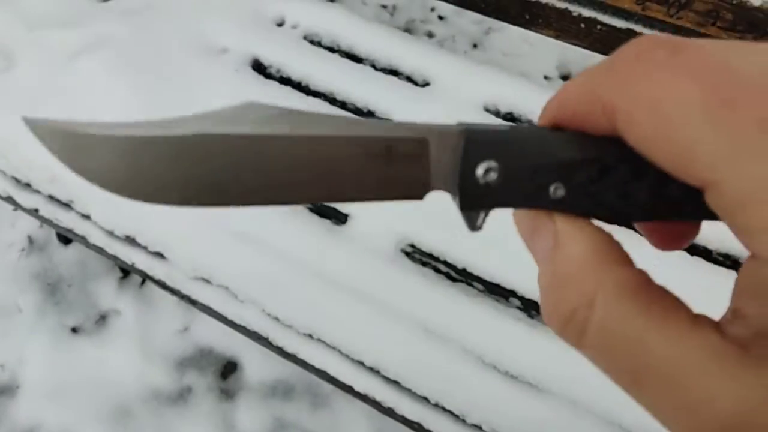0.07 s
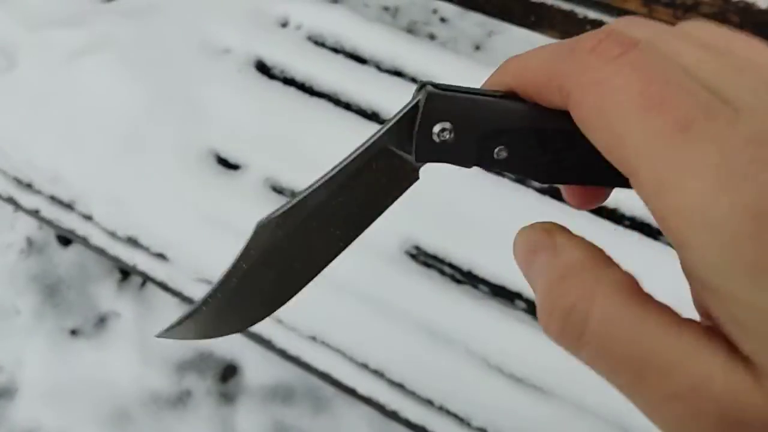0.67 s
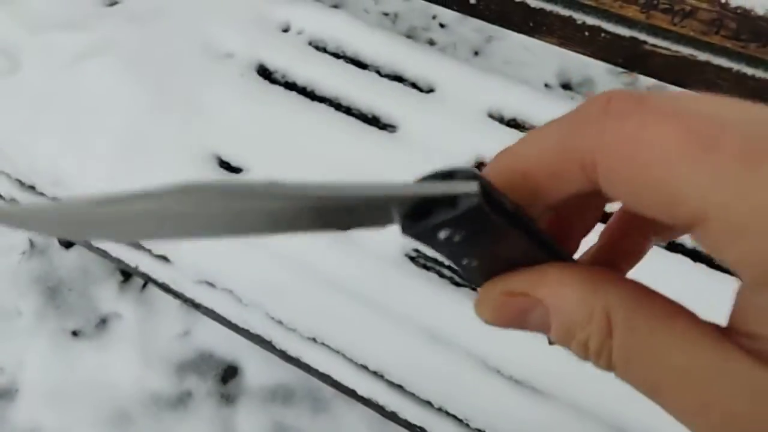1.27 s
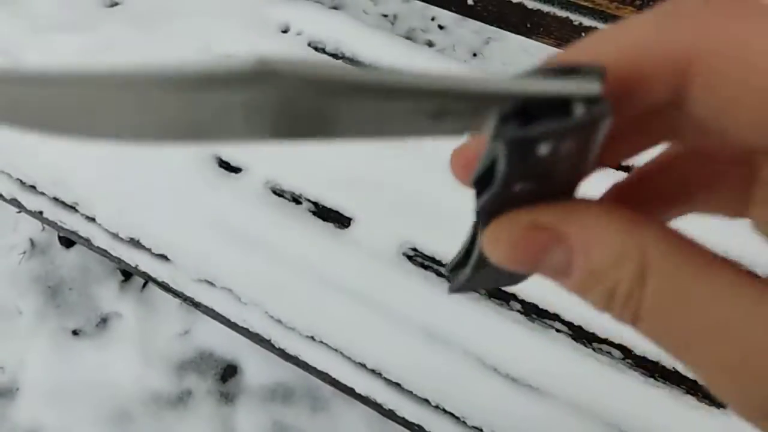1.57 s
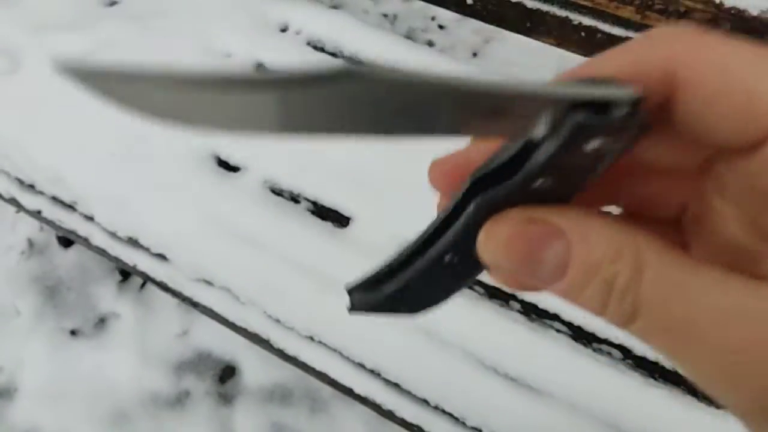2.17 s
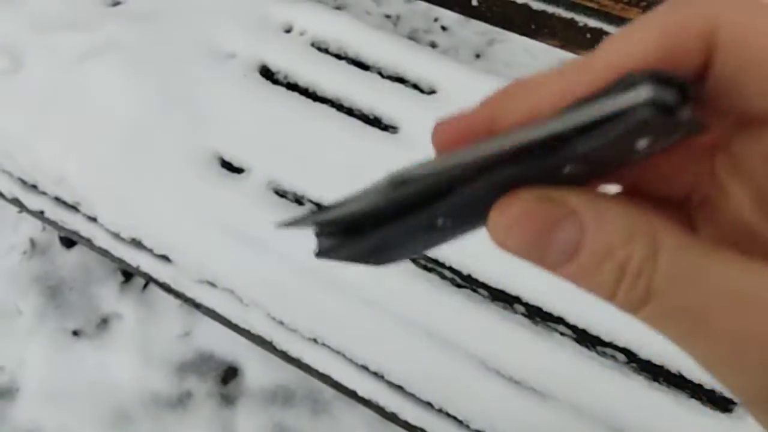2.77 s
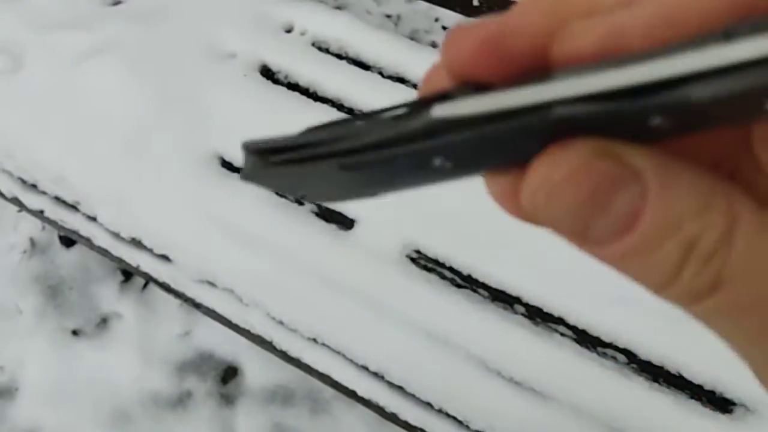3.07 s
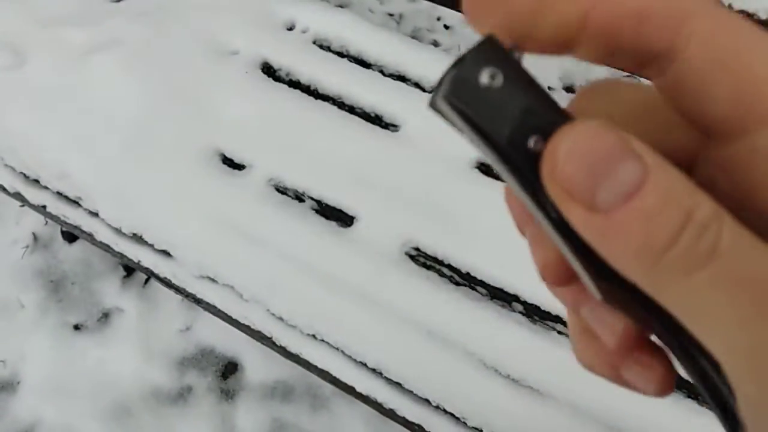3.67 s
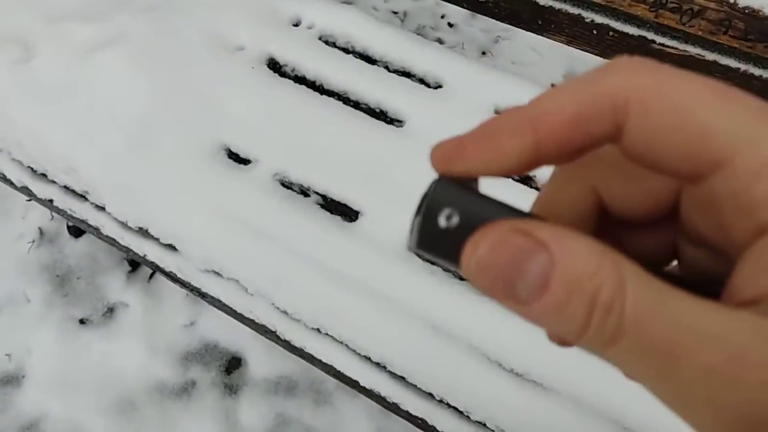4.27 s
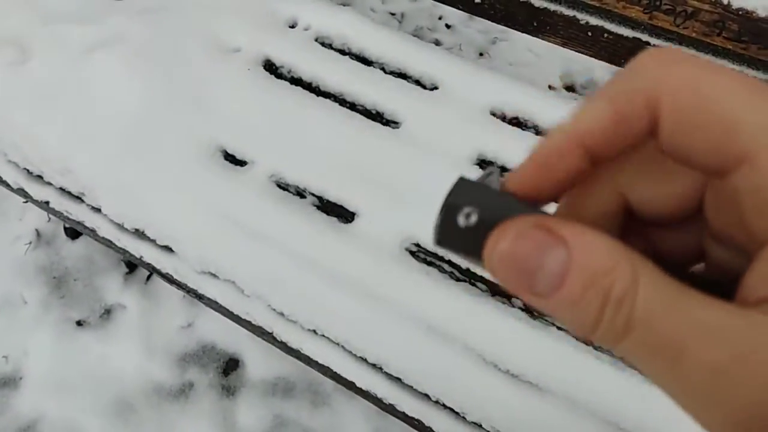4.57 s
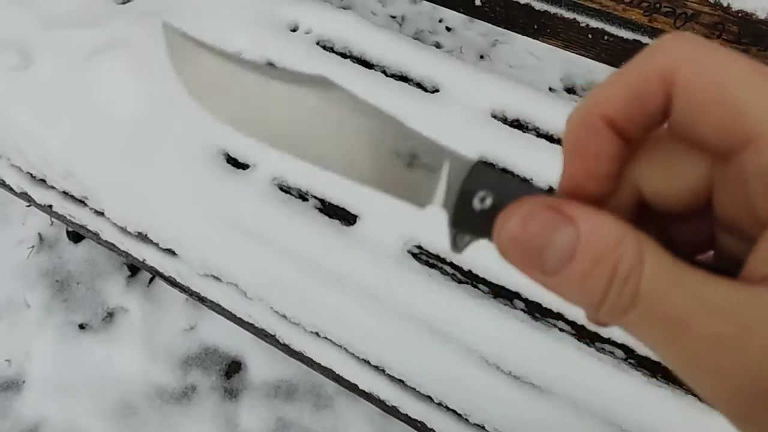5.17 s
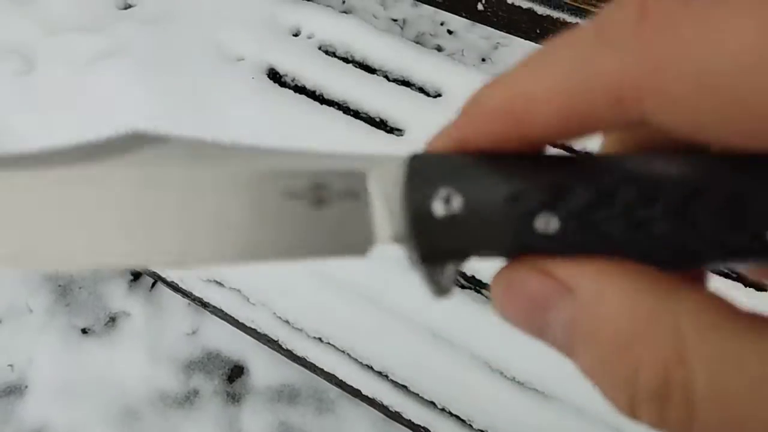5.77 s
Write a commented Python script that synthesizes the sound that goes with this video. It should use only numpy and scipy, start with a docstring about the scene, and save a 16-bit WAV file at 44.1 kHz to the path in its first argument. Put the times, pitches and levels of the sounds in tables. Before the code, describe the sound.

Sharp metallic clacks of a pocket knife closing and flicking open outdoors, with soft sleeve swishes, distant engine rumble and faint chirps.

```python
"""Outdoors in the snow, a flipper knife is unlocked, folded shut and flicked open close to a phone.
The lock snaps, the blade clacks and makes the steel ring, and the pivot scrapes and squeaks.
A nylon jacket sleeve swishes as the arm moves. Small birds chirp, a far engine gains speed over
an idling motor, something whoops once, and distant traffic hums behind it all.
The last clack is so loud that the phone's limiter briefly turns everything down."""
import sys
import numpy as np
from scipy import signal
from scipy.fft import rfft, irfft
from scipy.io import wavfile
from scipy.ndimage import uniform_filter1d, minimum_filter1d

SR = 44100
rng = np.random.default_rng(int(sys.argv[2]) if len(sys.argv) > 2 else 0)


def unload_wav(signal):
    """Save mono or channel-first audio to the path in sys.argv[1] as 16-bit WAV at rate SR, clipped to [-1, 1]."""
    wavfile.write(
        sys.argv[1],
        SR,
        np.round(np.clip(np.atleast_2d(signal).T, -1, 1) * 32767).astype(np.int16),
    )


N = 265482
T = np.arange(N) / SR
HZ = np.fft.rfftfreq(N, 1 / SR)

# Levels are relative: later gains and filters change them. side_db is left minus right.
# The blade shuts and bounces, then flies open against its stop:
# start_s, level_db, chatter_s, brightness_db_per_octave, side_db
BLADE_HITS = [(3.0958, -12, 0.00044, 1, 3), (3.0962, -2.5, 0.00083, 5.5, -3.5),
              (3.0970, -6.5, 0.0011, 4, 0), (3.0979, -4.5, 0.0016, 2.5, -10.5),
              (3.1030, -18, 0.00034, -3, 4), (3.1038, -13.5, 0.00099, 0, -9.5),
              (5.1948, -31, 0.0006, 1, -7), (5.2568, -21, 0.0019, -1, -7), (5.2614, -3.5, 0.00012, 3.5, -4),
              (5.2709, -1.5, 0.00057, -2, -8), (5.2715, 7.5, 0.00038, 0.5, -3),
              (5.2720, 15.5, 0.00064, 1.5, -3.5), (5.2786, -5.5, 0.00064, 26, -21)]
# The thumb pushes the lock aside: start_s, level_db, chatter_s, brightness_db_per_octave, side_db
LOCK_HITS = [(.6639, -12.5, 0.00037, 5.5, -11), (.6644, -26, 0.00089, 16, -4),
             (.6651, -22, 0.00023, -3, -1), (.6708, -33.5, .0006, 2, -17)]
# Steel and skin slide on the knife: start_s, length_s, level_db, side_db
SLIDE_STROKES = [(0.684, 0.057, -63.5, -13), (0.873, 0.13, -66, -2), (3.092, 0.021, -44, -17),
                 (3.692, 0.077, -70.5, -6), (3.865, 0.17, -69.5, -3.5), (4.57, 0.032, -63.5, -2),
                 (4.73, 0.034, -53, -5.5), (4.754, 0.06, -72, -3), (4.952, 0.18, -70.5, -8),
                 (5.183, 0.045, -54, -8), (5.203, 0.055, -48, -7), (5.247, 0.015, -45.5, -8),
                 (5.266, 0.012, -24.5, -11), (5.434, 0.048, -56.5, -3)]
# The knife's ring with the blade out: pitch_hz, level_db, fade_60db_s
OPEN_RING = [(2000, -6, 0.013), (2400, -14, 0.007), (3380, -13, 0.009), (4250, 3, 0.009), (4900, -6, 0.007),
             (5450, -10, .006), (7300, -15, 0.0084), (8190, -1, 0.0065), (9000, -10, 0.0062),
             (10380, -1, 0.005), (11300, -14, 0.0068), (14000, -8, .005)]
# Its ring with the blade in the handle: pitch_hz, level_db, fade_60db_s
SHUT_RING = [(2250, -12, .009), (2550, -9, .009), (2855, -8, 0.008), (3750, -15, 0.007), (4450, 3.5, .009),
             (4950, 4.5, 0.009), (5600, -8, .007), (6150, -2.5, 0.006), (7450, 0, 0.007), (8420, 8.5, .008),
             (9170, 1, 0.007), (10970, 10, 0.011), (12000, -10, .005), (13800, -10, 0.005)]
# The ring of the lock's spring: pitch_hz, level_db, fade_60db_s
LOCK_RING = [(4600, -6, .007), (5050, 2, 0.008), (5600, -3, 0.006), (8450, 2, 0.005), (9250, 5, 0.006),
             (10060, 2, 0.005), (11200, -9, .005), (12600, -7, .004), (14100, -3, .005)]
# The pitchless crack of a hit: frequency_hz, gain_db
CRACK_SPECTRUM = [(100, -30), (850, -10.5), (1400, -29), (3000, -33), (6000, -14.5), (8000, -5),
                  (11000, -5), (14000, -13.5), (15000, -14), (16500, -38.5)]
# The dry hiss of sliding: frequency_hz, gain_db
SCRAPE_SPECTRUM = [(200, -34.5), (1400, -20), (1750, -15), (2000, 0), (2250, -11.5), (2700, -18),
                   (3200, -16), (4000, -9), (5200, -3), (6200, -8.5), (7500, -0.5), (11000, -3.5),
                   (12400, 4), (14200, 10.5), (14800, -39)]
# The pivot squeaks: start_s, length_s, pitch_hz, glide_hz, quaver_share, level_db
PIVOT_SQUEAKS = [(.888, .062, 8600, 150, .034, -74.5), (.938, .045, 8200, -200, .018, -76)]
# A fingernail snaps off the opening tab: start_s, tick_db, thud_db, thud_fade_s, side_db
NAIL_SNAPS = [(4.5890, -13, -28.5, 0.001, -0.5), (4.5905, -20.5, -48, 0.0012, -15)]
# The ring of nail and tab: pitch_hz, level_db, fade_60db_s
TAB_RING = [(1000, -4, 0.0035), (2770, -16, 0.005), (6400, -1, 0.005), (7150, 1, 0.006), (7900, 1, 0.007),
            (9400, -7, 0.007)]

# The arm rocks to and fro: going_db, going_length_s, return_db, return_length_s
ARM_SWINGS = [(-65.5, 0.15, -63, 0.19), (-62.5, 0.14, -64.5, 0.13), (-58.5, 0.15, -62, 0.14),
              (-58, 0.13, -57, 0.17), (-57, 0.15, -67, 0.095), (-57.5, 0.18, -57, 0.21),
              (-57, 0.12, -53, 0.16), (-58.5, 0.15, -64, 0.18)]
# Single moves of the arm: middle_s, length_s, level_db, side_db
ARM_MOVES = [(0, 0.46, -68, 3), (0.327, 0.52, -69, 2.5), (0.538, 0.13, -68, 5), (.73, 0.51, -71.5, 2),
             (1.248, 0.28, -63.5, 3), (3.504, 0.46, -65.5, -2), (4.628, 0.34, -74, 2.5),
             (5.45, 0.66, -67, -11), (5.794, 0.89, -60.5, 6.5)]
# Nylon rubbing on nylon: frequency_hz, gain_db
NYLON_SPECTRUM = [(100, 0), (400, -3), (1500, 1.5), (3000, 2), (5000, -2), (7000, 1), (10000, -0.5),
                  (12500, 4.5), (14200, 10), (14700, -49.5)]

# A bird repeats one raspy note: start_s, level_db
BIRD_RASPS = [(1.515, -71), (1.635, -68), (1.78, -68.5), (2.05, -73.5)]
# Bird whistles: start_s, length_s, pitch_hz, glide_hz, level_db
BIRD_WHISTLES = [(4.932, .06, 4130, 300, -61), (5.013, .046, 4290, -110, -64),
                 (5.078, 0.046, 4180, 140, -65), (5.066, .09, 6510, 560, -73), (5.09, .055, 4570, 250, -74),
                 (5.141, 0.068, 4890, 150, -70), (5.14, .095, 6850, 60, -69.5),
                 (5.188, .034, 3740, -350, -62), (5.436, 0.057, 4130, -250, -69),
                 (5.512, 0.055, 4030, -280, -63.5), (5.553, .065, 4110, -450, -63)]
# The flock twitters farther off: from_s, to_s, note_level_db
FLOCK_SPELLS = [(1.5, 1.85, -77.5), (2.05, 2.2, -83), (4.92, 5.22, -75), (5.33, 5.6, -74.5)]
# Loudness of the far engine: time_s, level_db
ENGINE_LEVELS = [(0, -47.5), (.45, -46), (.8, -58), (1.05, -55), (1.26, -46), (2.2, -48), (2.82, -44),
                 (3.15, -51.5), (3.68, -50), (3.82, -62), (3.98, -50), (4.6, -56), (4.9, -51.5),
                 (5.22, -54), (5.6, -62)]
# Loudness of the octave above the idling motor's note: time_s, level_db
IDLE_OCTAVE_LEVELS = [(0, -81.5), (2.1, -68), (3.35, -62), (3.8, -73.5), (5.1, -71), (5.45, -63),
                      (6.02, -69)]
# The path of the whoop: time_s, pitch_hz, level_db
WHOOP_CURVE = [(.308, 343, -66), (.322, 288, -56.5), (.34, 264, -58.5), (.355, 298, -60), (.37, 392, -59),
               (.385, 430, -71)]
# Loudness of distant traffic: time_s, level_db
TRAFFIC_LEVELS = [(0, -64.5), (1.4, -64.5), (2.1, -63), (3.1, -63), (3.9, -65.5), (4.6, -66), (5.2, -61),
                  (6.02, -64)]
# The wash of that traffic: frequency_hz, gain_db
TRAFFIC_SPECTRUM = [(60, -1.5), (110, 5.5), (170, -1), (260, -1.5), (350, -2), (550, -0.5), (900, -4),
                    (1400, -9.5), (3000, -22), (7000, -30.5), (14000, -39)]
# Steady outdoor rumble: frequency_hz, gain_db
RUMBLE_SPECTRUM = [(10, -17), (28, 11), (45, -7), (65, -5.5), (82, -3.5), (115, -18.5), (170, -28.5),
                   (400, -61.5), (2000, -89.5)]

# How alike two microphones hear noise from all around: frequency_hz, likeness (-1 to 1)
MIC_LIKENESS = [(60, 0.69), (130, 0.47), (290, 0.75), (640, -0.23), (1400, -0.39), (3000, 0.61)]
# The tone of the microphone openings, left list then right list: frequency_hz, gain_db
MIC_SPECTRA = ([(1000, 0), (5000, 4.5), (7000, 5), (8500, 11.5), (9500, 16), (10400, 19.5), (11200, 14.5),
               (12200, 8), (14000, -4)], [(1000, 0), (5000, 3.5), (7000, 5.5), (7700, 12), (8350, 13),
               (9200, 8), (10400, 1), (12000, -9), (14000, -16)])


def knife(rub_ring_db=-9, lock_crack_db=-22, shut_from_s=3.05, shut_until_s=5.15):
    """Hits ring the steel, rubbing does so less; the ring changes while the blade is folded in."""
    blade, lock = impacts(BLADE_HITS), impacts(LOCK_HITS)
    rub = sliding() + buzz(blade + lock)
    force = blade + amp(rub_ring_db) * rub
    folded = (T > shut_from_s) & (T < shut_until_s)
    paths = [(force * folded, ringing(SHUT_RING)),
             (force * ~folded, ringing(OPEN_RING)),
             (lock, ringing(LOCK_RING)),
             (blade + amp(lock_crack_db) * lock, tone_filter(CRACK_SPECTRUM)),
             (rub, tone_filter(SCRAPE_SPECTRUM))]
    return sum(signal.oaconvolve(drive, body[None])[:, :N] for drive, body in paths)


def impacts(rows):
    """The force of steel hitting steel, each hit with its own brightness."""
    force = np.zeros((2, N))
    for start_s, db, chatter_s, brightness, side_db in rows:
        hardness = tone_filter([(500, -4 * brightness), (8000, 0), (16000, 0)])  # a four-octave slope
        add(force, start_s, amp(db) * pan(side_db) * signal.fftconvolve(hit(chatter_s), hardness[None]))
    return force


def hit(chatter_s, apart_rad=0.82, size=1024):
    """One hit as the two microphones hear it: mostly alike."""
    left, own = rng.standard_normal((2, size))
    right = np.cos(apart_rad) * left + np.sin(apart_rad) * own
    return np.array([chatter(left, chatter_s), chatter(right, chatter_s)])


def chatter(burst, fade_s):
    """Turns a burst of noise into a quickly dying rattle of tiny contacts, with energy 1."""
    fade = np.exp(-np.arange(len(burst)) / SR / max(fade_s, 1 / SR))
    burst = burst * fade ** .75
    for _ in range(5):  # even out the spectrum while keeping the burst short
        spectrum = rfft(burst * fade ** .25)
        burst = irfft(spectrum / (abs(spectrum) + 1e-12))
    burst = burst * fade ** .25
    return burst / np.linalg.norm(burst)


def ringing(notes, size=4096):
    """A struck part rings with fading notes, each peaking in the spectrum at its level."""
    t = np.arange(size) / SR
    return sum(amp(db - 60 * t / fade_s) * 2 * np.log(1000) / (fade_s * SR) * np.cos(2 * np.pi * hz * t)
               for hz, db, fade_s in notes)


def sliding():
    """The force of steel and skin rubbing, stroke by stroke."""
    force, rub = np.zeros((2, N)), friction(grain_db=1.5)
    for start_s, length_s, db, side_db in SLIDE_STROKES:
        grains = rub[:, round(start_s * SR):][:, :round(length_s * SR)]
        stroke = unit(grains * signal.windows.tukey(grains.shape[1], .7))
        add(force, start_s, amp(db) * pan(side_db) * stroke)
    return force


def friction(grain_db):
    """The hiss of countless tiny slips of uneven size."""
    return unit(rng.standard_normal((2, N)) * amp(grain_db * wander(690)))


def buzz(force, level_db=-22, fade_s=0.0044):
    """Loose parts rub for a moment after each hit, in step with its strength."""
    fade = np.exp(-np.arange(SR // 10) / SR / fade_s)
    power = abs(signal.oaconvolve(force ** 2, fade[None] / fade.sum())[:, :N])
    return amp(level_db) * np.sqrt(power) * rng.standard_normal((2, N))


def pivot(side_db=-14):
    """The swinging blade draws a thin, unsteady squeak from its bearing."""
    out = np.zeros((2, N))
    for start_s, length_s, pitch_hz, glide_hz, quaver, db in PIVOT_SQUEAKS:
        add(out, start_s, amp(db) * pan(side_db) * chirp(length_s, pitch_hz, glide_hz, quaver))
    return out


def fingertip(chatter_s=0.0003, give_s=.00009):
    """The nail ticks on the tab while the flesh gives one dull push and springs back."""
    out, t = np.zeros((2, N)), np.arange(SR // 20) / SR
    for start_s, tick_db, thud_db, fade_s, side_db in NAIL_SNAPS:
        tick = signal.fftconvolve(hit(chatter_s), ringing(TAB_RING)[None])
        thud = (1 - np.exp(-t / give_s)) * (1 - t / fade_s / 2) * np.exp(-t / fade_s)
        add(out, start_s, amp(tick_db) * pan(side_db) * tick)
        add(out, start_s, -amp(thud_db) * pan(0) * thud)
    return out


def sleeve(first_swing_s=1.443, period_s=.2612, return_after_s=.12, resting_db=-81.5):
    """Nylon rubs on nylon, once for each move and twice for each swing; it is never quite still."""
    power = amp(resting_db) ** 2 + sum(swish(*move) for move in ARM_MOVES)
    for k, (going_db, going_s, return_db, return_s) in enumerate(ARM_SWINGS):
        middle_s = first_swing_s + k * period_s
        power += swish(middle_s, going_s, going_db, side_db=4)
        power += swish(middle_s + return_after_s, return_s, return_db, side_db=1.5)
    weave = friction(grain_db=1.5) * amp(.8 * wander(45))  # the threads catch and let go
    rustle = unit(irfft(rfft(weave) * amp(value_at(NYLON_SPECTRUM, HZ)), N))
    return np.sqrt(power) * rustle


def swish(middle_s, length_s, db, side_db, growth=1.62):
    """The power of one stroke of cloth: loudness grows a little faster than its speed."""
    start_s = middle_s - length_s / 2
    speed = abs(np.sin(np.pi * np.clip((T - start_s) / length_s, 0, 1)))
    return (amp(db) * pan(side_db) * speed ** growth) ** 2


def birds(level_db=-7.5, notes_per_spell=12, rasp_voices_hz=(3990, 2950)):
    """Two-voiced rasps and whistles from some way off, over the twitter of the flock."""
    out = np.zeros((2, N))
    for from_s, to_s, db in FLOCK_SPELLS:
        for when, pitch, glide, side in rng.uniform(-1.1, 1, (notes_per_spell, 4)):
            note = chirp(length_s=.05, pitch_hz=4000 + 300 * pitch, glide_hz=300 * glide, quaver=.04)
            add(out, from_s + (to_s - from_s) * (when + 1) / 2, amp(db) * pan(2 * side) * note)
    for start_s, db in BIRD_RASPS:
        upper, lower = (chirp(.13, hz, glide_hz=120, quaver=.04) for hz in rasp_voices_hz)
        add(out, start_s, amp(db) * pan(0) * (upper + amp(-7) * lower))
    for start_s, length_s, pitch_hz, glide_hz, db in BIRD_WHISTLES:
        add(out, start_s, amp(db) * pan(0) * chirp(length_s, pitch_hz, glide_hz, quaver=.011))
    return amp(level_db) * with_echoes(out, fade_s=.25, echo_db=-5)


def chirp(length_s, pitch_hz, glide_hz, quaver, arch_hz=90):
    """One thin note whose pitch glides, bows up in the middle and quavers."""
    progress = np.linspace(0, 1, round(length_s * SR))
    arch = np.sin(np.pi * progress)
    flutter = unit(uniform_filter1d(rng.standard_normal(len(progress)), size=50))
    hz = (pitch_hz + glide_hz * (progress - .5) + arch_hz * (arch - 1)) * (1 + quaver * flutter)
    return unit(arch * np.sin(2 * np.pi * np.cumsum(hz) / SR))


def far_engine(start_hz=47.6, rise_hz_per_s=1.35, curve_hz_per_s2=.25, unsteady_hz=0.17):
    """An engine fires ever faster, so its note climbs, a little unsteadily."""
    firing_hz = start_hz + rise_hz_per_s * T + curve_hz_per_s2 * T ** 2 + unsteady_hz * wander(3.1)
    return tone(firing_hz, follow(ENGINE_LEVELS)[0], overtones=[(2, -30.5), (3, -33), (4, -38), (5, -36)])


def idling_motor(start_hz=67.35, sag_hz_per_s=.55, base_db=-63.5, flutter_db=3):
    """A second motor idles: its note slowly sags and its loudness flutters."""
    hz = start_hz - sag_hz_per_s * T
    flutter = flutter_db * wander(6.4)
    octave = tone(2 * hz, follow(IDLE_OCTAVE_LEVELS)[0] + flutter, overtones=[(2, -12)])
    return tone(hz, base_db + flutter) + octave


def whoop(roughness=0.52):
    """A brief hoarse tone that dips and rises."""
    sounding = (T > WHOOP_CURVE[0][0]) & (T < WHOOP_CURVE[-1][0])
    return tone(*follow(WHOOP_CURVE), overtones=[(2, -11)]) * sounding * (1 + roughness * wander(120))


def traffic(boost_db=4, swell_db=0.2, patch_db=2, rumble_db=-58):
    """Distant traffic is a swelling wash of noise over a steady rumble."""
    slices = signal.stft(all_around(TRAFFIC_SPECTRUM), nperseg=2048)[2]
    # louder and softer patches, smoothed over frequency and then over time
    patches = uniform_filter1d(rng.standard_normal(slices.shape[1:]), size=4, axis=0)
    patches = unit(uniform_filter1d(patches, size=5, axis=1))
    wash = unit(signal.istft(slices * amp(patch_db * patches), nperseg=2048)[1][:, :N])
    swell = amp(follow(TRAFFIC_LEVELS)[0] + boost_db + swell_db * wander(3.3))
    return pan(0.36) * (swell * wash + amp(rumble_db) * all_around(RUMBLE_SPECTRUM))


def all_around(spectrum):
    """Noise from every side, only partly alike at the two microphones."""
    left, own = rfft(rng.standard_normal((2, N)))
    likeness = np.clip(value_at(MIC_LIKENESS, HZ), -1, 1)
    right = likeness * left + np.sqrt(1 - likeness ** 2) * own
    return unit(irfft(np.array([left, right]) * amp(value_at(spectrum, HZ)), N))


def with_echoes(sound, fade_s, echo_db):
    """Trees and walls add scattered echoes that fall by 60 dB in fade_s."""
    t = np.arange(SR // 2) / SR
    echoes = rng.standard_normal((2, len(t))) * (rng.random((2, len(t))) < .03) * amp(-60 * t / fade_s)
    echoes /= np.linalg.norm(echoes[0])
    return sound + amp(echo_db) * signal.oaconvolve(sound, echoes, axes=1)[:, :N]


def tone(hz, db, overtones=()):
    """A tone of given pitch and level, with overtones as (multiple, level_db)."""
    phase = 2 * np.pi * np.cumsum(hz) / SR
    upper = sum(amp(k_db) * np.sin(k * phase) for k, k_db in overtones)
    return np.sqrt(2) * amp(db) * (np.sin(phase) + upper)


def tone_filter(spectrum, size=2048):
    """A filter with the given spectrum that makes no sound before it is struck."""
    log_gain = np.log(amp(value_at(spectrum, abs(np.fft.fftfreq(size, 1 / SR)))))
    return np.fft.ifft(np.exp(np.conj(signal.hilbert(log_gain)))).real[:size // 2]


def wander(rate_hz):
    """A smooth random wobble of typical size 1, mostly slower than rate_hz."""
    return unit(irfft(rfft(rng.standard_normal(N)) / (1 + (HZ / rate_hz) ** 4), N))


def amp(db):
    """Turns decibels into a gain."""
    return 10 ** (np.asarray(db) / 20)


def unit(x):
    """Scales a signal to a typical size (rms) of 1."""
    return x / np.sqrt(np.mean(x ** 2) + 1e-20)


def value_at(points, hz):
    """Reads between a table's frequencies, with octaves evenly spaced."""
    known_hz, values = np.transpose(points)
    return np.interp(np.log(hz + 1), np.log(known_hz + 1), values)


def follow(rows):
    """Turns each column of a timed table into a value at every sample."""
    times, *columns = np.transpose(rows)
    return [np.interp(T, times, column) for column in columns]


def pan(side_db):
    """Left and right gains, side_db apart."""
    return amp([[side_db / 2], [-side_db / 2]])


def add(mix, start_s, sound):
    """Adds a stereo sound to the mix at start_s."""
    part = mix[:, round(start_s * SR):][:, :sound.shape[1]]
    part += sound[:, :part.shape[1]]


def scene():
    """The knife and sleeve close by, the neighbourhood behind; snow returns hardly any echo."""
    near = with_echoes(knife(), fade_s=0.6, echo_db=-39) + pivot() + fingertip() + sleeve()
    far = traffic() + pan(1) * (far_engine() + idling_motor() + whoop())
    return near + far + birds()


def limiter(sound, ceiling=0.86, ahead_s=0.0058, hold_s=0.079):
    """Turns the sound down just ahead of a peak above the ceiling, holds, and lets go."""
    needed = np.minimum(1, ceiling / (abs(sound).max(0) + 1e-9))
    span = round((ahead_s + hold_s) * SR)
    held = minimum_filter1d(needed, span, origin=(span - 1) // 2 - round(ahead_s * SR))
    return sound * uniform_filter1d(held, size=130)


def record(dry, hiss_db=-70, hiss_top_hz=14400, top_hz=16600):
    """The phone's microphones colour the sound and hiss; it limits peaks and cuts the top treble."""
    heard = np.array([signal.oaconvolve(channel, tone_filter(mic))[:N]
                      for channel, mic in zip(dry, MIC_SPECTRA)])
    hiss = unit(irfft(rfft(rng.standard_normal((2, N))) * (HZ < hiss_top_hz), N))
    limited = limiter(heard + amp(hiss_db) * hiss)
    treble_cut = signal.firwin(511, top_hz, window=("kaiser", 9), fs=SR)
    return signal.oaconvolve(limited, treble_cut[None], "same")


dry = scene()
out = record(dry)
unload_wav(out)
```